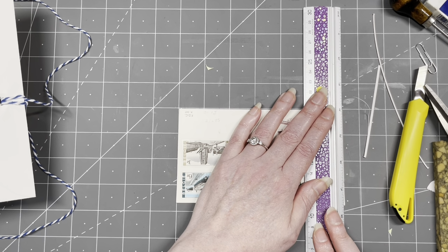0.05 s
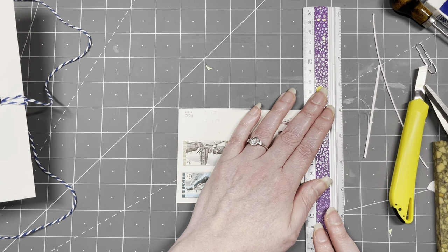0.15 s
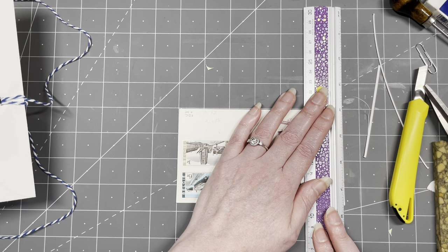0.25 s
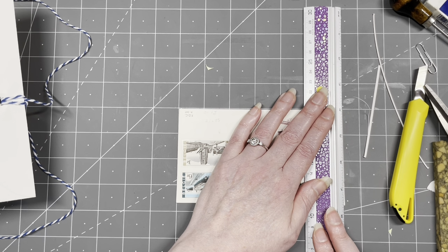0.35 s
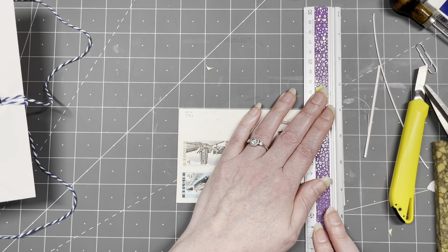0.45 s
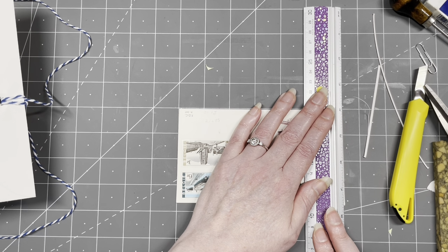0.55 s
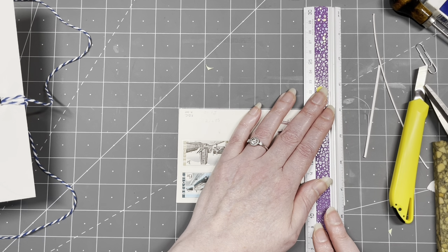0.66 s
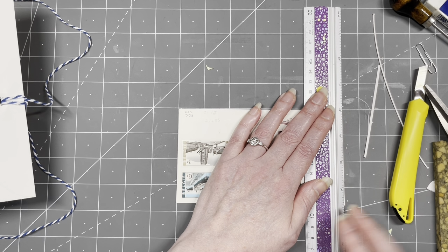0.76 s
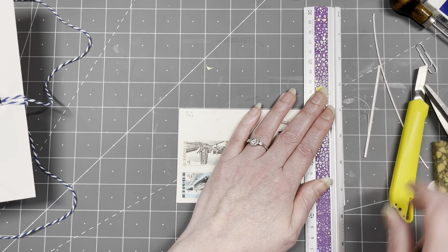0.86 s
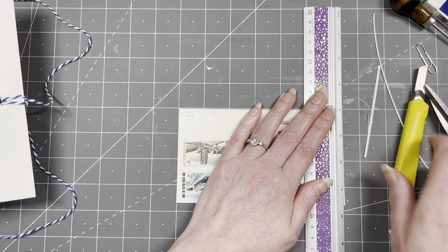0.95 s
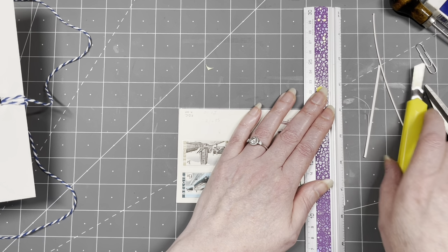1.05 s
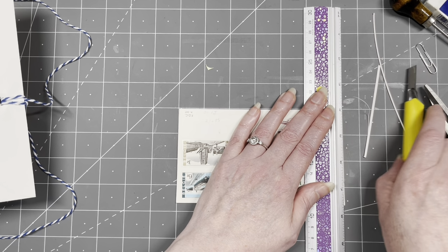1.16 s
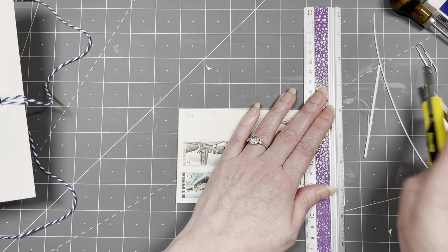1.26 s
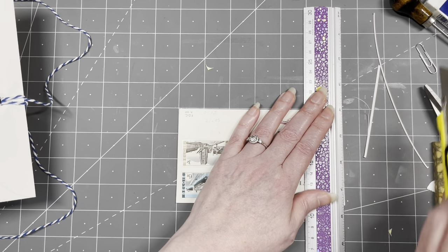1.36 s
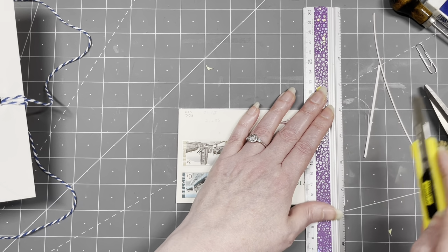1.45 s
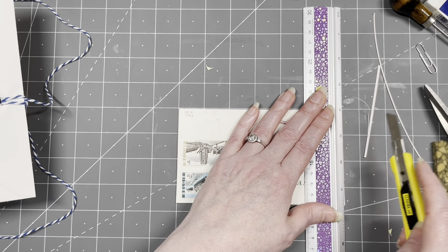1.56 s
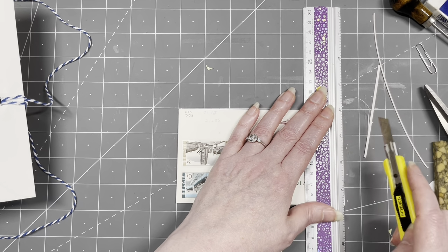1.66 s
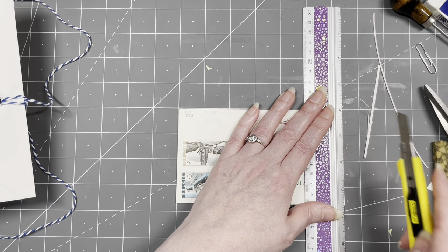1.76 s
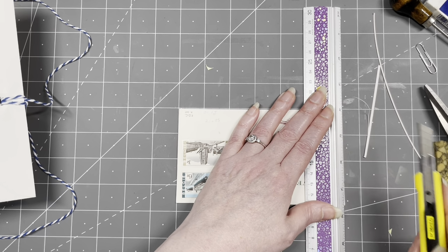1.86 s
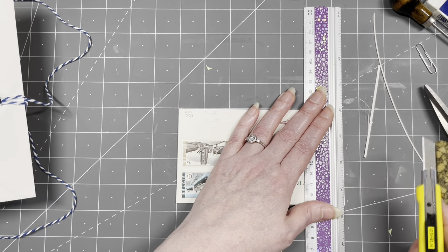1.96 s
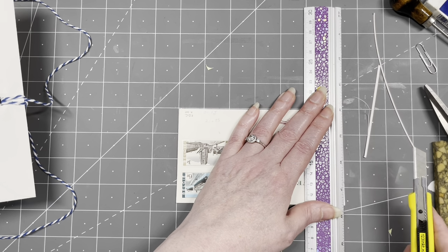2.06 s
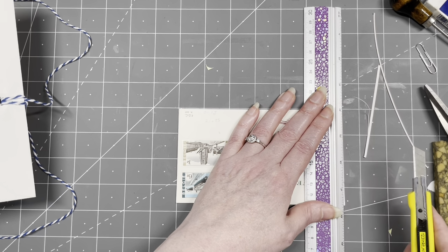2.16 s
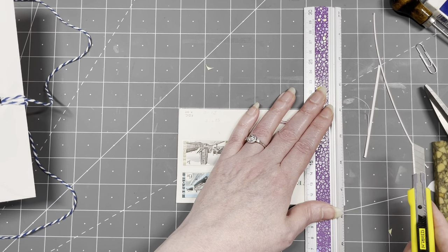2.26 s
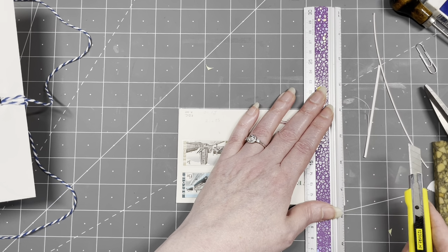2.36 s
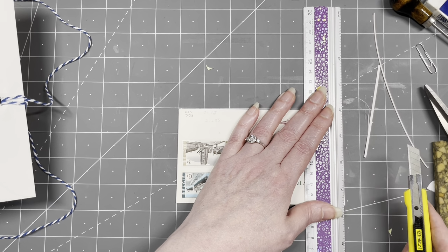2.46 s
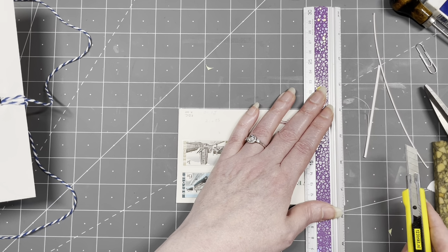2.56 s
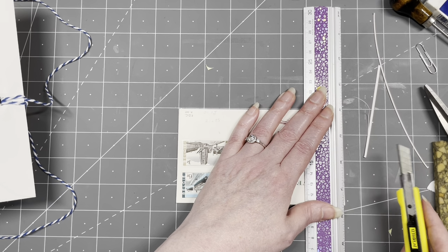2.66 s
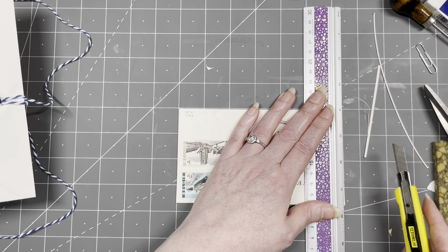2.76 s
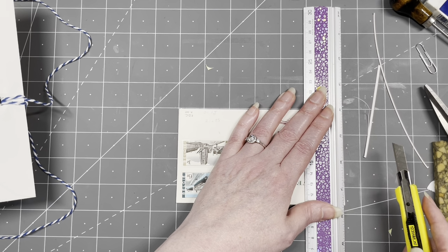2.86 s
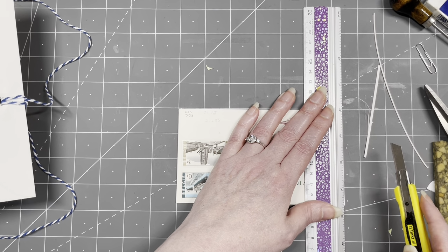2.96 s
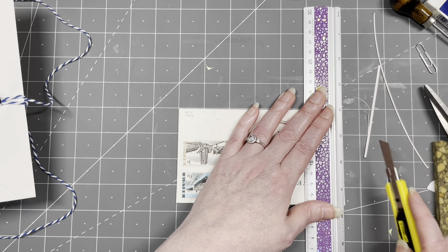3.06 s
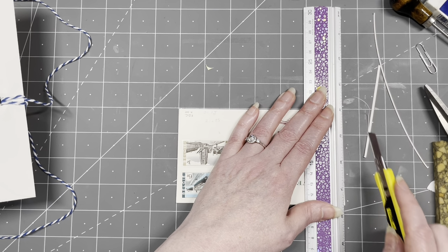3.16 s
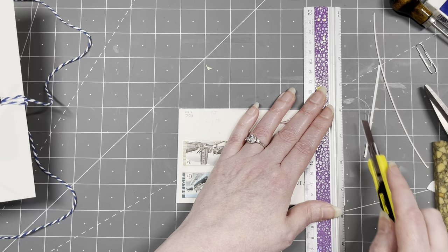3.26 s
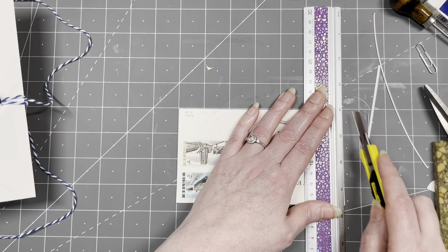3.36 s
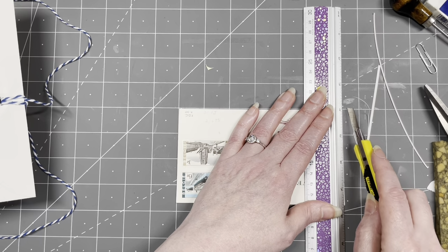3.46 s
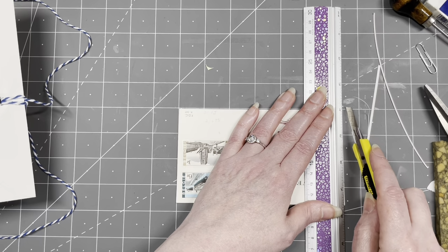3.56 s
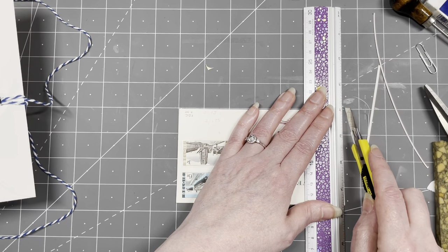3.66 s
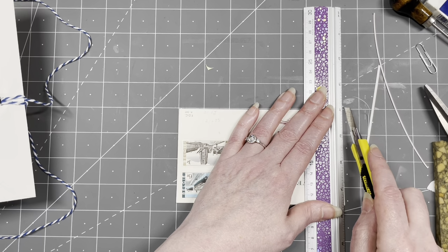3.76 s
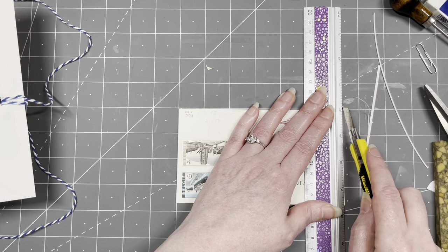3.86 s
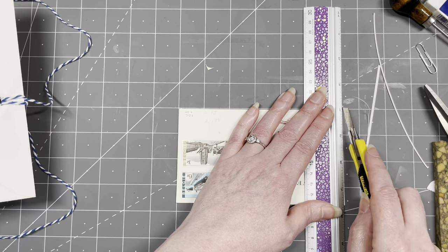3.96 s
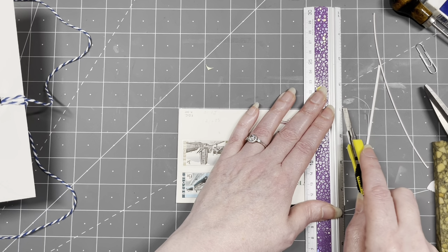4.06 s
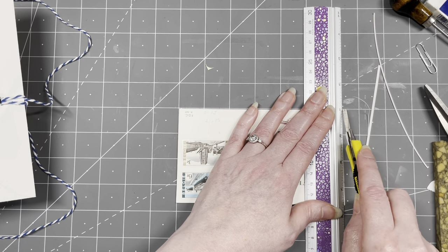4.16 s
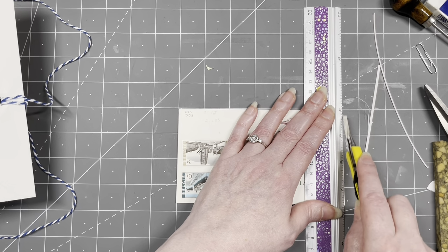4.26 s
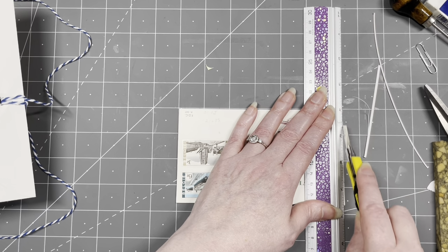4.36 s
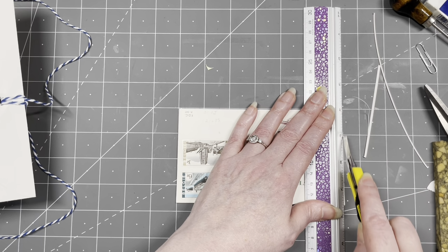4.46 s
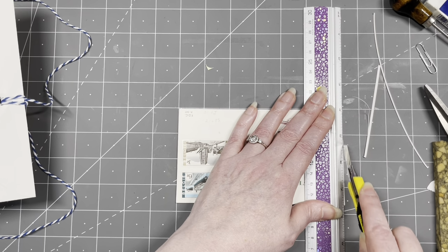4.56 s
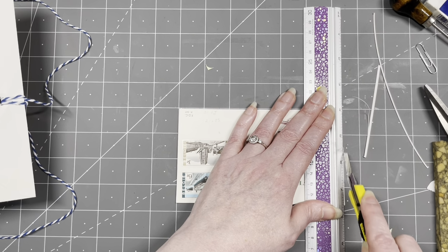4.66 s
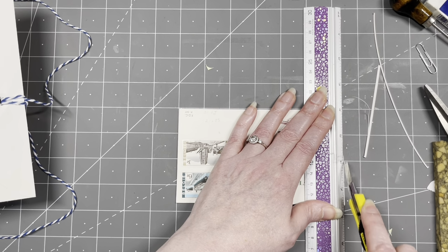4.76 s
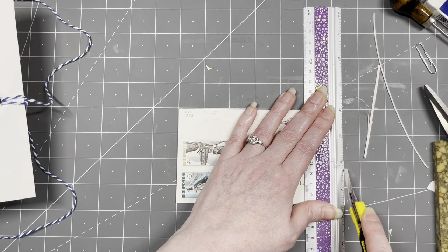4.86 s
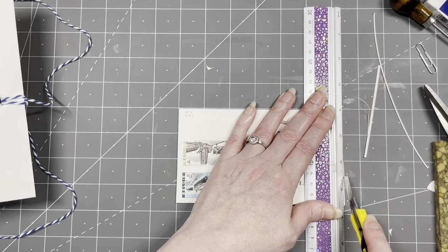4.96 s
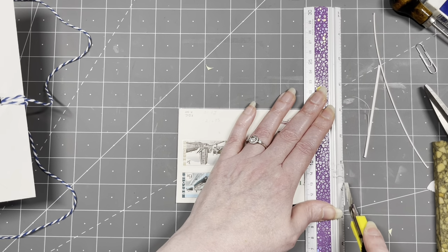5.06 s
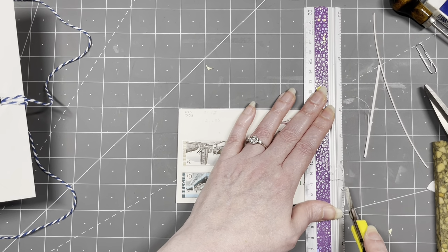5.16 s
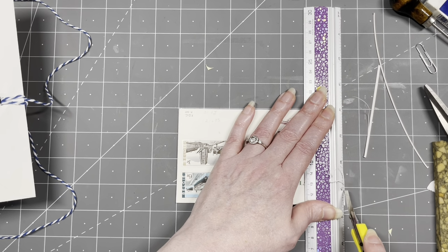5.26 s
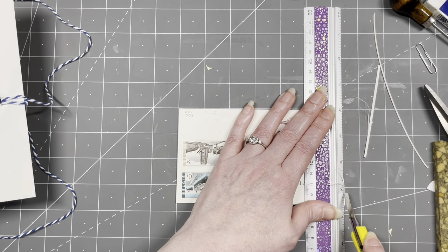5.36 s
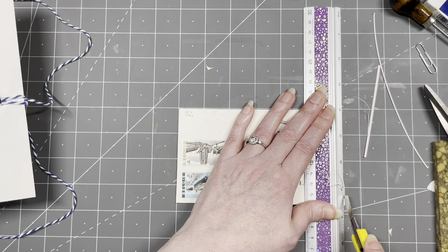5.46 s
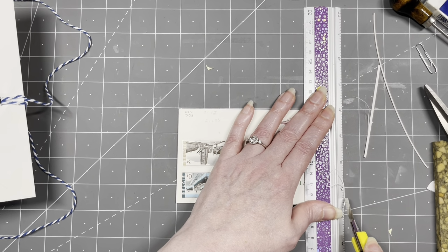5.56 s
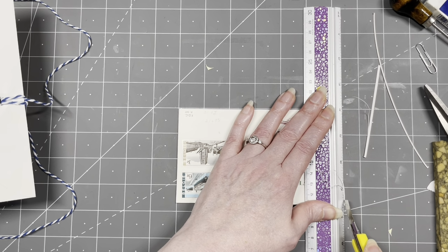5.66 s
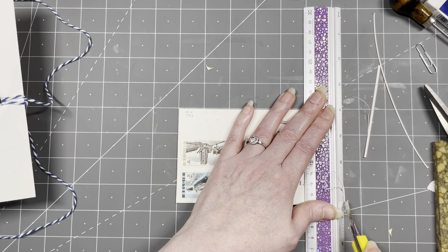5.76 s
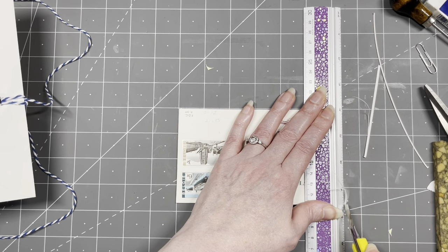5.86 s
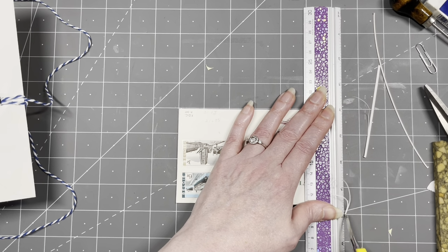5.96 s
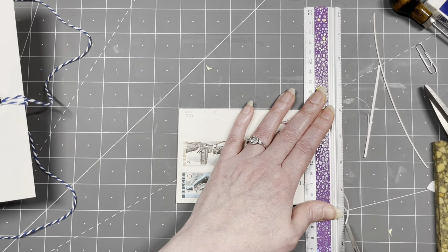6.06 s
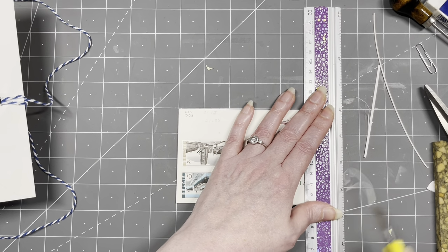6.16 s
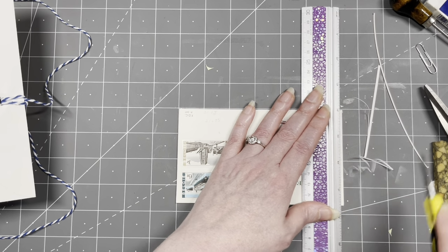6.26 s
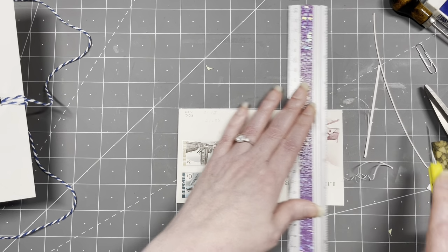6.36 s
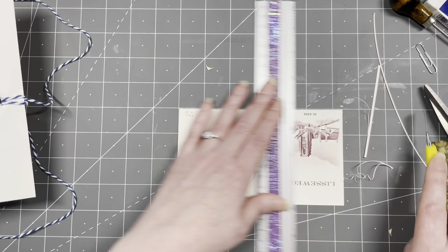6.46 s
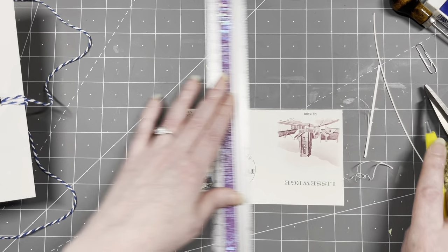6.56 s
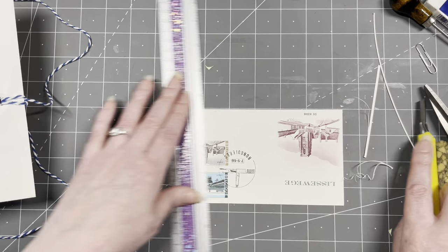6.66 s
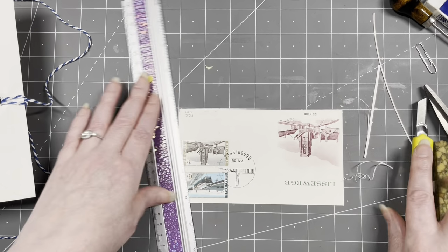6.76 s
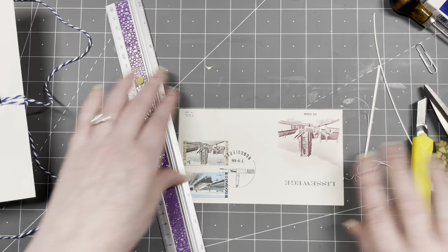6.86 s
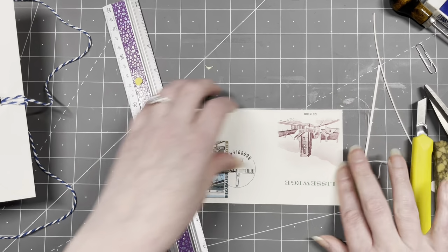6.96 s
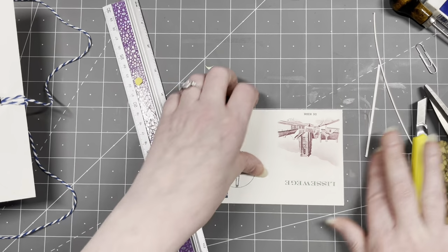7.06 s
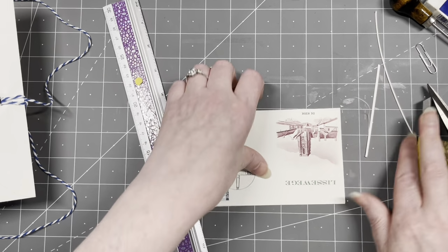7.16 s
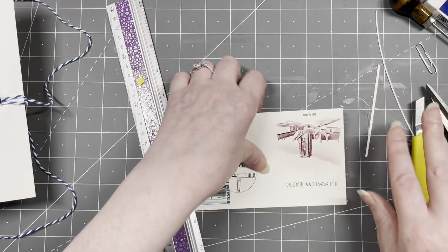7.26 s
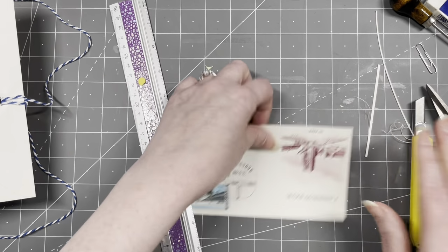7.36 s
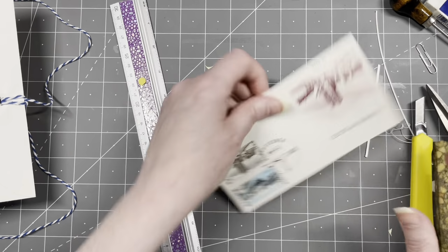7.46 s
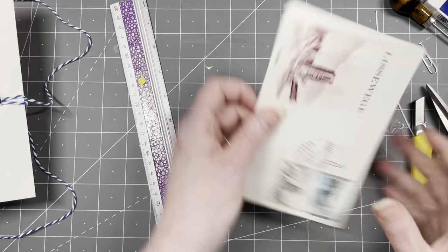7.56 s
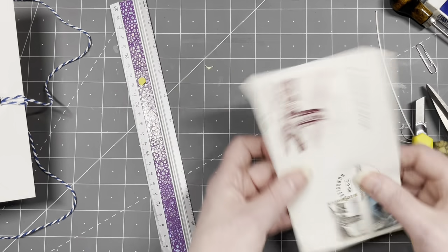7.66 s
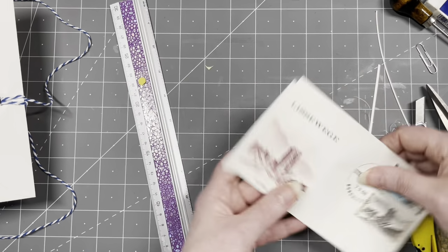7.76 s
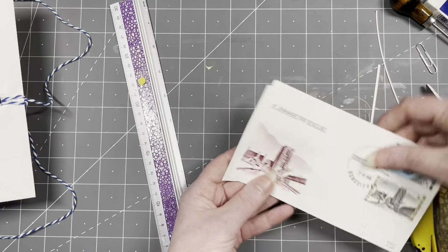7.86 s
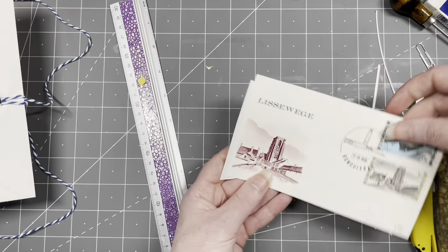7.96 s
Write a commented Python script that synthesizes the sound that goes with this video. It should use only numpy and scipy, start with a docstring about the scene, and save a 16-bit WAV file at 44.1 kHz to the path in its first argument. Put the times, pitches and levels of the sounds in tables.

```python
"""A craft knife is picked up, rattles in the hand and cuts paper along a ruler; the cut is many tiny snaps of noise.
The ruler is pushed away over the cutting mat: scraping noise and a low judder that follow its speed.
The knife and hands land on the mat: short noise bursts and ringing tones, with thumps of the desk.
Last, the stiff paper is brushed and lifted; it rustles and pops. A low room hum made of noise lies under it all."""
import sys
import numpy as np
from scipy import signal
from scipy.fft import rfft, irfft, next_fast_len
from scipy.io import wavfile
from scipy.ndimage import map_coordinates

SR = 44100
rng = np.random.default_rng(int(sys.argv[2]) if len(sys.argv) > 2 else 0)


def bounce(signal):
    """Save signal as a 16-bit WAV file at the path given by the first command-line argument."""
    frames = np.transpose(np.atleast_2d(signal))
    limited = np.clip(frames, -1, 1)
    pcm = np.round(limited * 32767).astype(np.int16)
    wavfile.write(sys.argv[1], SR, pcm)


N = 353417

# the hum of the room: (frequency [Hz], level [dB])
HUM_COLOUR = [(22, -10.5), (35, -6), (50, 1.5), (68, 1.5), (85, -1), (102, 2), (130, -18.5), (200, -21.5),
              (320, -27), (600, -35), (1500, -44), (4000, -48.5), (10000, -53.5), (15800, -65)]
# how much the hum differs between the channels: (frequency [Hz], level under the common part [dB])
HUM_WIDTH = [(60, -17.5), (150, -14), (380, -5.5), (950, -1), (2380, -4), (5980, -7), (15000, -5)]
# how long the room rings: (frequency [Hz], time to fall 60 dB [s])
ROOM_DECAY = [(150, 0.28), (2000, 0.17), (12000, 0.11)]
# the right channel is shaded: (frequency [Hz], left over right [dB])
SHADING = [(200, 0), (400, -.5), (700, .8), (1500, 0), (3000, 3), (5000, 6), (7000, .5), (9000, 0)]
# the left channel lags in the treble: (frequency [Hz], lag [radians])
LEFT_LAG = [(100, 0), (5400, 0), (8200, 3.1), (11500, 6.3), (14800, 9.4), (16500, 9.9)]
# handle, cut, ruler and hands, landings, paper on the desk:
# (left over right [dB], near scatter [dB], share of the shading [ratio])
PLACES = [(0, -5, 1), (0.5, -7, 0.56), (0, -5.5, 0.75), (0, -5, 1.43), (0, -14.5, 0.67)]
SCATTER_WIDTH = 0.2  # share of the near scatter that reaches the other channel inverted
TOP_HZ = 15800  # the band limit

# the desk's low sway: (frequency [Hz], level [dB], time to fall 60 dB [s])
DESK_SWAY = [(71.7, -2.5, 0.29), (130.9, -0.5, 0.13), (192.8, -10.5, 0.11)]
# the higher knock of the desk top: (frequency [Hz], level [dB], time to fall 60 dB [s])
DESK_KNOCK = [(253, 6.5, 0.12), (378.7, 7.5, 0.079), (495, 0, 0.07), (577, -3.5, 0.094), (815, 1.5, 0.021),
              (1205, -4.5, 0.017), (1436, -1.5, 0.052)]
# the desk's low tones under a sharp blow: (frequency [Hz], level [dB], time to fall 60 dB [s])
DESK_THUD = [(73.4, -7.5, 0.24), (131, 1.5, 0.17), (184, -10.5, 0.1)]
# a hand leans on the desk and rocks it: (time [s], peak level [dB])
LEANS = [(6.485, -34.5), (6.664, -34), (6.961, -33), (7.064, -38), (7.428, -39)]
ROCKING_HZ, ROCKING_S = 73, 0.021  # the desk's deepest tone; the time it takes to swell
# the palm shuffles on the mat: (time of peak [s], level [dB], rise [s], fall [s])
SHUFFLES = [(6.445, -46, 0.04, 0.058), (6.54, -45.5, 0.032, 0.039), (7.1, -53.5, 0.067, .08),
            (7.15, -48, 0.07, 0.15)]
# skin on the mat: (frequency [Hz], level [dB])
PALM_COLOUR = [(200, 5.5), (500, -4), (1000, -11), (2000, -13), (6000, -37)]

# rubbed paper: (frequency [Hz], level [dB])
PAPER_COLOUR = [(300, 1.5), (900, -8), (1500, 0), (2500, 1), (4000, -1), (6500, 3.5), (9000, 1),
                (12000, -1), (15800, -5.5)]
# the flexing sheet: (frequency [Hz], level [dB])
FLEX_COLOUR = [(300, 6), (700, -8.5), (1300, -1.5), (2200, -7), (2800, -8.5), (4500, -15), (12000, -24.5)]
# tones of the buckling sheet: (frequency [Hz], level [dB], time to fall 60 dB [s])
SHEET_TONES = [(480, -9, .013), (820, -2, .012), (1040, 0, .018), (1450, -4, .012), (2150, -14, .009),
               (2480, -14, .009)]
# the stiff paper buckles: (time [s], peak level [dB], stiffness [pitch ratio], snap level [dB])
POPS = [(7.486, -42, 0.93, -49), (7.621, -39, 0.81, -42), (7.642, -28.5, 0.91, -34),
        (7.66, -47, 0.8, -21.5), (7.665, -38, 1.2, -16), (7.671, -23, 0.96, -20.5),
        (7.678, -18, 1.02, -24.5), (7.7703, -24, 1.02, -33), (7.8774, -29, 1.01, -55),
        (7.883, -31.5, 0.97, -55)]
# fingers brush the paper: (time of peak [s], level [dB], rise [s], fall [s])
BRUSHES = [(6.97, -63, 0.023, 0.78), (7.16, -52, 0.1, 0.13), (7.32, -49, 0.12, 0.1),
           (7.41, -44, 0.16, 0.062), (7.718, -51.5, 0.023, 0.05), (7.744, -47.5, 0.043, 0.03),
           (7.81, -70, 0.086, 0.3)]
# the sheet flexes in the hands: (time of peak [s], level [dB], rise [s], fall [s])
FLEXES = [(7.52, -60.5, 0.077, 0.26), (7.585, -63.5, 0.063, 0.08), (7.69, -52, 0.21, 0.067),
          (7.74, -55, 0.088, 0.068), (7.785, -56.5, 0.039, 0.11), (7.822, -56.5, 0.064, 0.038),
          (7.95, -63, 0.39, 0.18)]
# small crackles as the paper is handled: (time [s], peak level [dB], frequency [Hz])
CRACKLES = [(7.155, -43, 4270), (7.165, -36.5, 3900), (7.224, -45, 4000), (7.342, -41.5, 3050),
            (7.726, -39, 2880), (7.737, -42, 1480), (7.742, -36.5, 1300), (7.819, -42.5, 1440)]
CRACKLE_T60, CRACKLE_Q = 0.028, 8  # time for its noise to fall 60 dB (s); how sharply it is tuned
FLUTTER_DB, FLUTTER_RATE = 1, 70  # the rubbing catches and lets go: depth; random points a second
HOLD_DB = -1.5  # skin rubbing on the sheet, over its flexing
SHEET_RUMBLE_DB = 1.5  # the held sheet's low rumble, over its flexing

# the ruler on the mat: (frequency [Hz], level [dB])
SCRAPE_COLOUR = [(300, -1), (600, -16), (1000, -17), (1500, -10), (2200, -8), (2850, -8.5), (3300, -4),
                 (3850, -8), (5000, -9.5), (6000, -11.5), (7000, -9), (8500, -9.5), (12000, -13.5),
                 (15800, -19)]
# the sliding ruler's resonances: (frequency [Hz], width [Hz], lift [dB])
RULER_PEAKS = [(1480, 170, 4), (2080, 200, 2.5), (3350, 210, 8), (4300, 200, 2), (5000, 200, 3),
               (5500, 150, 2)]
# the ruler's edge catches on the mat: (time of peak [s], level [dB], rise [s], fall [s])
CATCHES = [(6.278, -55.5, 0.028, .06), (6.445, -42.5, 0.066, .09), (6.538, -43.5, .02, .03),
           (6.638, -40.5, .03, 0.026)]
SLIDE_START_S, SLIDE_SPEEDUP_S, SLIDE_STOP_S = 6.157, 0.4, 6.73  # the ruler is pushed aside
BRAKE_S = 0.055  # time constant in which it comes to rest
SCRAPE_DB, SCRAPE_POWER = -38.5, 1.93  # its scrape at full speed; amplitude grows as speed to this power
JUDDER_DB, JUDDER_POWER = -43, 4  # the same for its drag on the desk

# ruler, knife and fingers land on the mat:
# (time [s], clack level [dB], thump level [dB], brightness [dB per octave])
LANDINGS = [(6.546, -33, -46, -10), (6.5822, -18, -34.5, -2.5), (6.587, -25.5, -32, -6.5),
            (6.6644, -17, -37, -5), (6.7232, -27.5, -45, -12.5), (6.7286, -9.5, -15, 0),
            (6.7445, -9.5, -19.5, 0), (6.7698, -25.5, -36, -0.5), (6.808, -48, -39, -6),
            (6.9486, -49.5, -36, 7.5), (7.0495, -51, -31, -12), (7.073, -42, -46, -4),
            (7.1315, -23, -31.5, 4.5), (7.203, -22.5, -19.5, -2), (7.2565, -37.5, -40.5, -13),
            (7.264, -35.5, -34.5, 0), (7.4165, -16, -35, -4), (7.421, -23.5, -47, -4),
            (7.4338, -26, -38.5, -9.5)]
# hard plastic on the mat: (frequency [Hz], level [dB])
PLASTIC_COLOUR = [(1900, -10), (2600, -6.5), (3300, -5.5), (4200, -5.5), (5600, -3.5), (7000, -3.5),
                  (9000, -4), (12000, -9.5), (15800, -12.5)]
# the knife's body rings when it is put down and nudged: (time [s], peak level [dB])
BODY_HITS = [(6.7295, -10.5), (6.7455, -23), (7.418, -33)]
# tones of the knife's body: (frequency [Hz], level [dB], time to fall 60 dB [s])
BODY_TONES = [(1507, -11, .07), (3400, -3, 0.027), (4150, 0, 0.029), (4430, -4.5, 0.03), (5320, -1, 0.04),
              (5600, -5, .04), (6800, -7, .04)]
# the steel's long tone: (frequency [Hz], level [dB], time to fall 60 dB [s])
STEEL_TONES = [(2040, 0, 0.26)]
STEEL_S, STEEL_DB = 6.7454, -54  # steel rings on faintly after the knife lands: when; peak
SCUFF_S = 0.014  # scuff before a blow
DULL_KNOCK = 0.95  # dB more knock for each dB per octave that a blow is duller

# the knife clatters on the mat as it is picked up; the grip retunes its handle:
# (time [s], clack level [dB], thump level [dB], brightness [dB per octave], ring level [dB], ring pitch [ratio])
CLATTER = [(0.698, -50, -62, -5.5, -61, 0.99), (0.9948, -69.5, -48, -0.5, -60.5, 0.64),
           (1.0386, -44, -50, -1, -56.5, 1.3), (1.053, -28, -34, 4, -31.5, 1.3),
           (1.072, -27, -27, 0, -33.5, 1.5), (1.168, -20.5, -33, -3, -30, 1.05),
           (1.1855, -33.5, -38, -1, -42.5, 1), (1.2, -25, -43.5, 5, -34, 0.87),
           (1.21, -26.5, -36.5, 1.5, -26, 0.96), (1.2193, -24, -36, 1, -24.5, 1.02),
           (1.2265, -30.5, -46.5, 0, -38, 1.1)]
# the hollow knife handle when struck: (frequency [Hz], level [dB])
HANDLE_COLOUR = [(1500, -23), (2300, -8), (3100, -3), (4200, -6.5), (5500, -9.5), (7000, -8.5),
                 (10000, -12.5), (13000, -15.5), (15800, -17.5)]
# tones of the hollow handle: (frequency [Hz], level [dB], time to fall 60 dB [s])
HANDLE_TONES = [(2950, 0, .02), (3540, -4, .015), (5350, -4, .017)]
# the handle when rubbed: (frequency [Hz], level [dB])
RUBBED_COLOUR = [(2000, -4), (2600, -3.5), (3000, -1.5), (3800, -1.5), (4600, -11), (7000, -4.5),
                 (11000, -7), (15800, -5.5)]
# the rubbed handle's main resonance: (frequency [Hz], width [Hz], lift [dB])
RUBBED_PEAKS = [(3450, 380, 7)]
# fingers rub the handle: (time of peak [s], level [dB], rise [s], fall [s])
GRIPS = [(.71, -69.5, 0.05, 0.054), (.83, -83, 0.09, 0.049), (1.09, -65, 0.067, 0.15),
         (1.23, -66, .07, 0.19), (1.39, -71, 0.16, 0.17), (1.435, -60, 0.087, 0.063),
         (1.475, -67, 0.06, 0.042), (3.03, -79.5, 0.091, 0.58), (4.08, -79.5, 0.15, 0.18)]
# the loose blade ticks in its holder: (time [s], level [dB], pitch [ratio], brightness [dB per octave])
TICKS = [(1.552, -68, 1.25, 10), (1.714, -53.5, 1, 5), (2.692, -40.5, 0.98, -8), (2.7058, -62, 0.91, -4),
         (2.7185, -54, 0.88, -4), (2.9893, -41.5, 1.1, 0), (3.912, -64, 0.79, -12), (3.996, -63.5, 1.7, 14),
         (4.091, -54.5, 2.3, 4), (4.1646, -46, 1.38, 0), (6.111, -49.5, 1.55, 7.5), (6.148, -42, 0.93, 4),
         (6.2223, -51, 1.1, 4)]
# tones of the blade: (frequency [Hz], level [dB], time to fall 60 dB [s])
BLADE_TONES = [(2250, -15, 0.024), (2710, -6, 0.014), (3130, -5.5, 0.0094), (4450, -12, 0.0064),
               (5400, -9.5, 0.011)]
# the blade scrapes in its channel: (time of peak [s], level [dB], rise [s], fall [s])
SHIFTS = [(2.708, -67, 0.04, 0.046), (2.99, -79.5, 0.06, 0.08)]
# the blade squeaks in its channel: (time [s], peak level [dB], frequency [Hz])
SQUEAKS = [(2.658, -69, 2320), (2.677, -64, 2300), (2.959, -71, 4230), (3.025, -67, 2950)]
SQUEAK_T60, SQUEAK_Q = 0.057, 21  # time for its noise to fall 60 dB (s); how sharply it is tuned

# paper parting under the blade: (frequency [Hz], level [dB])
FIBRES_EARLY = [(300, 6), (600, -61), (1050, 0.5), (1500, -13.5), (2100, -13.5), (2650, -5.5), (3400, -7.5),
                (4300, -4), (5300, -16.5), (7000, -12.5), (9000, -5.5), (11500, -14), (13300, -18.5),
                (15800, -14)]
# the cut at the end of the stroke: (frequency [Hz], level [dB])
FIBRES_LATE = [(300, 1), (620, 3), (1000, -1), (1400, -18), (2050, -6.5), (2650, -17), (3250, -10.5),
               (3850, -13), (4400, -10), (5000, -15), (6000, -16), (8000, -17), (10500, -20), (13000, -22),
               (15800, -28)]
# the bright rasp at the start of the stroke: (frequency [Hz], width [Hz], lift [dB])
EARLY_RASP = [(6550, 630, 6.5)]
# the knife resonates as it cuts: (frequency [Hz], width [Hz], lift [dB])
KNIFE_PEAKS = [(2040, 270, 4.5), (3900, 120, 1)]
# how hard the blade bites: (time [s], level [dB])
STROKE = [(4.19, -65), (4.23, -54.5), (4.298, -50.5), (4.498, -50.5), (4.562, -53), (5.0, -52),
          (5.318, -62.5), (5.378, -57), (5.442, -65), (5.458, -57.5), (5.55, -64.5), (5.746, -64.5),
          (5.784, -77), (5.83, -58.5), (6.13, -68.5)]
# the tip sinks in and runs off the edge: (time [s], depth [0-1])
TIP_DEPTH = [(4.17, 0.29), (4.28, 0.44), (5.91, 1), (5.98, 0.18)]
# the change from the early to the late colour of the cut: (time [s], share [0-1])
TRAVEL = [(4.5, 0.31), (4.85, 0.34), (5.25, 0.48)]
# the close reflection of the cut: (time [s], delay [s])
REFLECTION = [(4.4, .00082), (4.9, .00072), (5.8, .00079)]
# resonances (+) and hollows (-) pass through the hiss as hand and knife travel:
# (time when strongest [s], lasts either side [s], frequency then [Hz], drift [Hz per s], width [Hz], lift [dB])
SWEEPS = [(4.373, 0.2, 7320, 398, 300, 15.5), (4.45, 0.51, 4640, -300, 110, -7),
          (4.423, 0.14, 5530, 3, 300, 12), (4.79, 0.19, 6130, 204, 172, -24),
          (4.956, 0.28, 2200, -300, 200, 5), (5.0, 0.17, 7550, -200, 220, 10),
          (5.348, 0.42, 4660, 500, 173, -15), (5.35, 0.34, 7420, 459, 150, -6),
          (5.4, 0.32, 3900, 0, 110, -1), (5.757, 0.32, 4220, 257, 160, 7), (5.8, 0.25, 6200, 307, 402, 10),
          (5.809, 0.33, 2680, -200, 170, -17), (5.8, 0.32, 1540, -150, 200, 0),
          (4.4, 0.29, 2150, -400, 111, -6), (4.9, 0.19, 13700, 0, 500, 12),
          (5.598, 0.29, 940, -150, 220, 4)]
RASP_DB = -7  # coarse fibres that snap singly, over the fine ones
TEAR_DB, TEAR_GROWS_DB = 1, 2.5  # tearing over the bite; what it gains along the stroke
FIZZ_DB, FIZZ_FADES_DB = 5, 20  # treble over the tearing; what it loses along the stroke
PULL_DB, PULL_FOLLOWS = -46.5, 0.77  # the desk's rumble at the mean bite; dB per dB of bite
ENTRY_DB_PER_S = 402  # the scrape sets in as the tip is drawn forward
LIFT_OFF_DB_PER_S = 126.5  # the scrape dies as the blade is lifted

SWELL_DB = 20  # a rub climbs this far in its rise time and sinks as far in its fall time
PATCH_HZ, PATCH_S = 260, 0.07  # size of the patches in which a rub changes colour


def amp(db):
    """Turn decibels into a plain multiplier."""
    return 10 ** (np.asarray(db) / 20)


def unit(x):
    """x scaled to an average (RMS) strength of 1."""
    return x / np.sqrt(np.mean(x ** 2) + 1e-20)


def along(points, hz):
    """Read a (Hz, value) table at any frequency, on a log axis."""
    f, v = np.transpose(points)
    return np.interp(np.log(hz + 1), np.log(f + 1), v)


def curve(rows):
    """Turn (s, value) points into one value per sample."""
    return np.interp(np.arange(N) / SR, *np.transpose(rows))


def wobble(rate):
    """A smooth random curve through rate random points a second."""
    points = rng.standard_normal(int(N * rate / SR) + 4)
    return map_coordinates(points, [np.arange(N) * rate / SR])


def filtered(x, response):
    """Multiply the spectrum of x by a response that depends on frequency."""
    m = next_fast_len(N + SR // 2)
    spectrum = rfft(x, m) * response(np.fft.rfftfreq(m, 1 / SR))
    return irfft(spectrum, m)[..., :N]


def coloured(x, spectrum, low_hz):
    """Give x a tone colour that falls away under low_hz."""
    return filtered(x, lambda hz: amp(along(spectrum, hz)) * hz ** 3 / (hz ** 3 + low_hz ** 3))


def resonant(x, peaks):
    """x with each resonance lifted."""
    def response(hz):
        return amp(sum(db / (1 + ((hz - centre) / width) ** 2) for centre, width, db in peaks))
    return filtered(x, response)


def swept(x, sweeps):
    """x with resonances and hollows that swell, drift and fade."""
    hz, t, z = signal.stft(x, SR, nperseg=1024)
    lift_db = 0
    for s, lasts, centre, drift, width, db in sweeps:
        in_time = ((t - s) / lasts) ** 2
        in_pitch = ((hz[:, None] - centre - drift * (t - s)) / width) ** 2
        lift_db = lift_db + db * np.exp(-in_time - in_pitch)
    return signal.istft(z * amp(lift_db), SR, nperseg=1024)[1][:N]


def shifting(x, patchy_db):
    """The point of contact wanders, so the colour of a rub changes in brief patches."""
    hz, t, z = signal.stft(x, SR, nperseg=256)
    field = rng.standard_normal((int(hz[-1] / PATCH_HZ) + 2, int(t[-1] / PATCH_S) + 2))
    patches = map_coordinates(field, np.meshgrid(hz / PATCH_HZ, t / PATCH_S, indexing="ij"))
    return unit(signal.istft(z * amp(patchy_db * patches), SR, nperseg=256)[1][:N])


def swells(rubs):
    """The gain of a series of rubs, each rising to its peak and falling away."""
    t = np.arange(N) / SR
    each = []
    for s, db, rise, fall in rubs:
        away = np.maximum((s - t) / rise, (t - s) / fall)
        each.append(amp(db - SWELL_DB * away))
    return np.linalg.norm(each, axis=0)


def add(track, s, sound):
    """Mix a sound into the track at time s."""
    part = track[round(s * SR):][:len(sound)]
    part += sound[:len(part)]


def ring(modes, scatter_db, pitch=1):
    """A struck object: fading tones with randomly varied strengths, scaled to peak 1."""
    t = np.arange(SR // 3) / SR
    y = np.zeros(len(t))
    for k, (hz, db, t60) in enumerate(modes):
        fade = amp(db + scatter_db * rng.normal() - 60 * t / t60)
        y += (-1) ** k * fade * np.sin(2 * np.pi * pitch * hz * t)
    return y / np.abs(y).max()


def burst(t60):
    """The chatter of one contact: noise that falls 60 dB in t60 seconds."""
    t = np.arange(SR // 4) / SR
    return rng.standard_normal(len(t)) * np.exp(-np.log(1000) * t / t60)


def contact(t60, tint_db, bright=0):
    """A faint scuff leads into a burst, tilted by bright dB per octave; each contact has its own colour."""
    lead = np.arange(-round(SCUFF_S * SR), 0) / SR
    scuff = amp(-22 + 1000 * lead) * rng.standard_normal(len(lead))
    y = np.r_[scuff, burst(t60)]
    z = rfft(y)
    tint = map_coordinates(rng.standard_normal(26), [np.linspace(0, 25, len(z))])
    octaves = np.log2(np.fft.rfftfreq(len(y), 1 / SR).clip(1500, 12000) / 4500)
    return irfft(z * amp(tint_db * tint + bright * octaves), len(y))


def crackles(rows, t60, q):
    """Each crackle or squeak is a brief chatter in one narrow resonance."""
    out = np.zeros(N)
    for s, db, hz in rows:
        y = signal.lfilter(*signal.iirpeak(hz, q, fs=SR), burst(t60))
        add(out, s, amp(db) * y / np.abs(y).max())
    return out


def friction(rate, spread_db, catch_db):
    """Tiny slips, rate a second on average, of uneven size, bunched where the surface catches."""
    happens = rng.random(N) < rate / SR
    slips = happens * rng.standard_normal(N) * amp(spread_db * rng.standard_normal(N))
    catching = wobble(220) + 0.31 * wobble(30)
    return unit(slips * amp(catch_db * catching))


def trimmed(x):
    """The desk's deepest motion is held back below about 55 Hz."""
    return signal.sosfilt(signal.butter(2, 55, "high", fs=SR, output="sos"), x)


def drag(force, knock_db):
    """An uneven pull, softened by the mat, shakes the desk's low tones."""
    body = ring(DESK_SWAY, 0) + amp(knock_db) * ring(DESK_KNOCK, 0)
    softened = signal.sosfilt(signal.butter(4, 750, fs=SR, output="sos"), force)
    return unit(trimmed(signal.fftconvolve(softened, body)[:N]))


def panned(x, left_db):
    """x in both channels, the left one louder by left_db."""
    return x * amp([[left_db / 2], [-left_db / 2]])


def hum():
    """Low room rumble, alike in both channels in the bass and more diffuse above, with a faint hiss."""
    common, apart = coloured(rng.standard_normal((2, N)), HUM_COLOUR, low_hz=5.9)
    apart = filtered(apart, lambda hz: amp(along(HUM_WIDTH, hz))) * np.array([[1], [-1]])
    rumble = unit(panned(common, left_db=0.8) + apart)
    return amp(-59) * rumble + amp(-92.5) * rng.standard_normal((2, N))


def room(x):
    """The room's echoes blur into a short tail of fading noise, different in each channel."""
    hz, t, z = signal.stft(rng.standard_normal((2, SR // 2)), SR, nperseg=256)
    fade = amp(-60 * t / along(ROOM_DECAY, hz)[:, None])
    tail = signal.istft(z * fade, SR, nperseg=256)[1]
    wash = signal.fftconvolve(x[None], tail / np.linalg.norm(tail[0]), axes=1)[:, :N]
    return coloured(wash, [(500, 2.5), (4000, 2.5), (12000, -10.5)], low_hz=203.2)


def placed(x, left_db, scatter_db, shading):
    """x in both channels, with what tools and desk top scatter within a few milliseconds."""
    paths = np.array([burst(t60=0.03), burst(t60=0.03)])[:, :SR // 30]
    echo = signal.oaconvolve(x[None], paths / np.linalg.norm(paths[0]), axes=1)[:, :N]
    echo = echo - SCATTER_WIDTH * echo[::-1]
    colour = [(120, -8), (250, 0), (500, 1), (1000, -3), (2200, -2), (4000, -5), (9000, -7)]
    echo = coloured(echo, colour, low_hz=230)
    side = np.array([[0.5], [-0.5]])
    both = panned(x, left_db) + amp(scatter_db) * echo
    return filtered(both, lambda hz: amp(side * shading * along(SHADING, hz)))


def hands():
    """Hands lean on the desk, which rocks softly as a low tone, and shuffle on the mat."""
    rocking, t = np.zeros(N), np.arange(SR // 3) / SR
    swell = (t / ROCKING_S) ** 2 * np.exp(2 - 2 * t / ROCKING_S)
    for s, db in LEANS:
        add(rocking, s, amp(db) * swell * np.sin(2 * np.pi * ROCKING_HZ * t))
    skin = friction(rate=1400, spread_db=2, catch_db=1)
    return rocking + swells(SHUFFLES) * unit(coloured(skin, PALM_COLOUR, low_hz=170))


def paper():
    """The sheet is brushed, lifted off the mat and pops as it flexes; the rubbing flutters."""
    pops, snap = np.zeros((2, N))
    for s, db, stiffness, snap_db in POPS:
        add(pops, s, amp(db) * ring(SHEET_TONES, scatter_db=5, pitch=stiffness))
        add(snap, s, amp(snap_db) * burst(t60=0.041))
    flex = swells(FLEXES)
    skin = shifting(friction(rate=5000, spread_db=2, catch_db=1), patchy_db=2)
    rustle = unit(coloured(skin, PAPER_COLOUR, low_hz=220))
    creases = friction(rate=2000, spread_db=3, catch_db=2)
    crinkle = unit(coloured(creases, FLEX_COLOUR, low_hz=284))
    rubbing = (swells(BRUSHES) + amp(HOLD_DB) * flex) * rustle + flex * crinkle
    flutter = amp(FLUTTER_DB * wobble(FLUTTER_RATE))
    rumble = amp(SHEET_RUMBLE_DB) * flex * drag(creases, knock_db=-17.5)
    snaps = coloured(snap, FLEX_COLOUR, low_hz=228)
    return pops + rumble + snaps + flutter * rubbing + crackles(CRACKLES, CRACKLE_T60, CRACKLE_Q)


def ruler():
    """The ruler speeds up, scrapes across the mat in uneven rubs and stops; speed drives scrape and drag."""
    t = np.arange(N) / SR
    speeding_up = np.clip((t - SLIDE_START_S) / SLIDE_SPEEDUP_S, 0, 1)
    braking = np.exp(-np.maximum(t - SLIDE_STOP_S, 0) / BRAKE_S)
    speed = speeding_up * braking
    grit = shifting(friction(rate=4500, spread_db=2.3, catch_db=1), patchy_db=2)
    hiss = unit(resonant(coloured(grit, SCRAPE_COLOUR, low_hz=267), RULER_PEAKS))
    rubs = amp(1.1 * wobble(40))
    scrape = np.hypot(amp(SCRAPE_DB) * speed ** SCRAPE_POWER, swells(CATCHES))
    judder = drag(friction(rate=580, spread_db=5, catch_db=1.5), knock_db=2.5)
    return scrape * rubs * hiss + amp(JUDDER_DB) * speed ** JUDDER_POWER * judder


def knocks(blows, colour, t60, knock_loss_db, clack_share, tint_db):
    """Each blow clacks the plastic, knocks the desk top (more if dull) and sets the desk swaying."""
    clack, desk, dull = np.zeros((3, N))
    for s, clack_db, thump_db, bright, *_ in blows:
        # the knock's level lies between clack and thump, before the losses
        between_db = clack_share * clack_db + (1 - clack_share) * thump_db
        knock_db = between_db - knock_loss_db - DULL_KNOCK * bright
        add(clack, s - SCUFF_S, amp(clack_db) * contact(t60, tint_db, bright))
        add(desk, s, amp(knock_db - 1) * ring(DESK_KNOCK, scatter_db=4))
        add(dull, s, amp(knock_db + 3) * burst(t60=0.072))  # the mat's dull slap
        add(desk, s + 0.0049, amp(thump_db) * ring(DESK_THUD, scatter_db=5))
    slap_colour = [(400, 4.5), (1200, -4.5), (4000, -20), (12000, -35.5)]
    slap = coloured(dull, slap_colour, low_hz=219.3)
    return coloured(clack, colour, low_hz=1110) + trimmed(desk) + slap


def knife_ring():
    """The knife's body rings briefly as it meets the mat, and the steel a little longer."""
    out = np.zeros(N)
    for s, db in BODY_HITS:
        add(out, s, amp(db) * ring(BODY_TONES, scatter_db=2))
    add(out, STEEL_S, amp(STEEL_DB) * ring(STEEL_TONES, 0))
    return out


def handle():
    """The hollow handle rings with each clack of the pick-up, at a pitch set by the grip."""
    out = np.zeros(N)
    for s, _, _, _, ring_db, pitch in CLATTER:
        add(out, s, amp(ring_db) * ring(HANDLE_TONES, scatter_db=0.5, pitch=pitch))
    return out


def fingers():
    """Skin rubs lightly on the hollow handle: many tiny slips, shaped by its resonance."""
    skin = friction(rate=3900, spread_db=0.5, catch_db=0)
    rub = resonant(coloured(skin, RUBBED_COLOUR, low_hz=1883), RUBBED_PEAKS)
    return swells(GRIPS) * unit(rub)


def blade():
    """The blade shifts in its steel channel, taps it, rings briefly and squeaks."""
    steel, crack = np.zeros((2, N))
    for s, db, pitch, bright in TICKS:
        add(steel, s, amp(db - 3) * ring(BLADE_TONES, scatter_db=5.5, pitch=pitch))
        add(crack, s - SCUFF_S, amp(db - 0.5) * contact(t60=0.0078, tint_db=1, bright=bright))
    slips = friction(rate=1700, spread_db=2.5, catch_db=3)
    scrape = unit(signal.fftconvolve(slips, ring(BLADE_TONES, 0))[:N])
    taps = steel + coloured(crack, HANDLE_COLOUR, low_hz=2107)
    return taps + swells(SHIFTS) * scrape + crackles(SQUEAKS, SQUEAK_T60, SQUEAK_Q)


def cut():
    """Fibres snap under the blade; its bite drives tearing, fizz and the pull on the desk."""
    n = np.arange(N)
    s, db = np.transpose(STROKE)
    entry_db = ENTRY_DB_PER_S * np.maximum(s[0] - n / SR, 0)
    lift_off_db = LIFT_OFF_DB_PER_S * np.maximum(n / SR - s[-1], 0)
    bite_db = curve(STROKE) - entry_db - lift_off_db
    travel, depth = curve(TRAVEL).clip(0, 1), curve(TIP_DEPTH).clip(0, 1)

    fine = friction(rate=12000, spread_db=1.7, catch_db=1.3)
    coarse = friction(rate=600, spread_db=1.5, catch_db=1.3)
    snaps = fine + amp(RASP_DB) * coarse
    early = unit(resonant(coloured(snaps, FIBRES_EARLY, low_hz=270), EARLY_RASP))
    slips = friction(rate=4500, spread_db=3, catch_db=2)
    late = unit(coloured(slips, FIBRES_LATE, low_hz=290))
    fibres = shifting(np.sqrt(1 - travel) * early + np.sqrt(travel) * late, patchy_db=2.2)
    direct = unit(resonant(fibres, KNIFE_PEAKS))

    # a close, inverted reflection hollows the hiss
    reflected = map_coordinates(direct, [n - curve(REFLECTION) * SR])
    hiss = swept(direct - (0.041 + 0.53 * travel) * reflected, SWEEPS)
    treble = filtered(hiss, lambda hz: hz ** 6 / (hz ** 6 + 7000.0 ** 6))
    body = filtered(hiss, lambda hz: 1 / (1 + (hz / 1500) ** 6))
    # the treble thins along the stroke; the low parts need the tip to be in the paper
    fizz = amp(FIZZ_DB - FIZZ_FADES_DB * travel) * treble
    tearing = hiss - treble - 1.04 * (1 - depth) * body + fizz
    rumble = drag(friction(rate=900, spread_db=1, catch_db=0), knock_db=-6.5)

    snags_db = (0.6 + travel) * wobble(22)
    tear_gain = amp(bite_db + snags_db + TEAR_DB + TEAR_GROWS_DB * travel)
    pull_gain = depth * amp(PULL_DB + PULL_FOLLOWS * (bite_db - db.mean()))
    return tear_gain * tearing + pull_gain * rumble


def scene():
    """Everything happens on the desk, with its near scatter and the room behind."""
    pickup = knocks(CLATTER, HANDLE_COLOUR, t60=0.04, knock_loss_db=4, clack_share=0.35, tint_db=2.5)
    landings = knocks(LANDINGS, PLASTIC_COLOUR, t60=0.032, knock_loss_db=8, clack_share=0.43, tint_db=3)
    in_hand = pickup + handle() + blade() + fingers()
    # in the order of PLACES
    sources = [in_hand, cut(), ruler() + hands(), landings + knife_ring(), paper()]
    close = sum(placed(x, *place) for x, place in zip(sources, PLACES))
    return close + amp(-17) * room(sum(sources)) + hum()


def record(dry):
    """The two channels differ in phase in the treble; a steep filter cuts what lies above the band limit."""
    side = np.array([[0.5], [-0.5]])

    def response(hz):
        lag = np.exp(-1j * side * np.interp(hz, *np.transpose(LEFT_LAG)))
        return lag / (1 + (hz / TOP_HZ) ** 120)
    return filtered(dry, response)


dry = scene()
out = record(dry)
bounce(out)
```